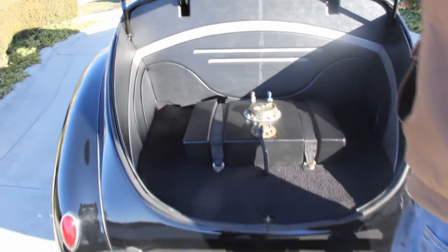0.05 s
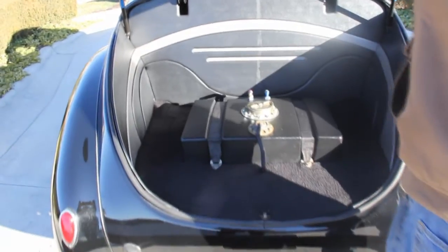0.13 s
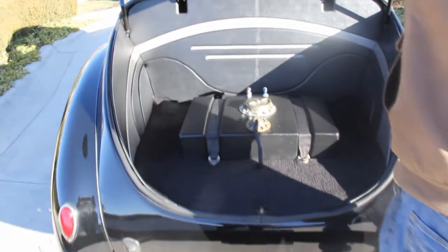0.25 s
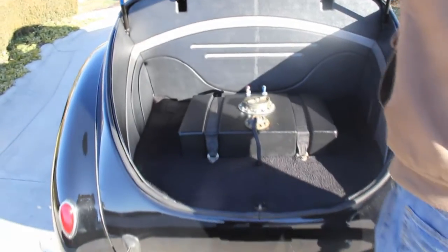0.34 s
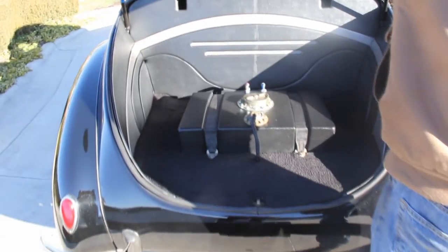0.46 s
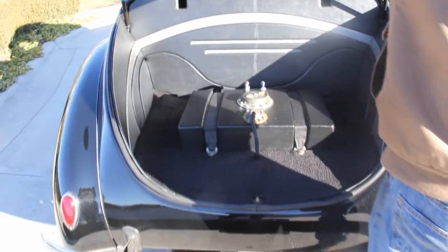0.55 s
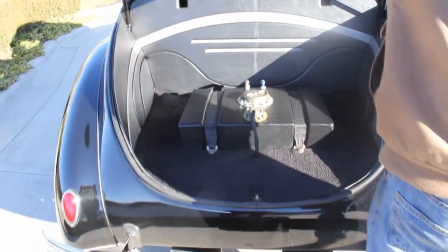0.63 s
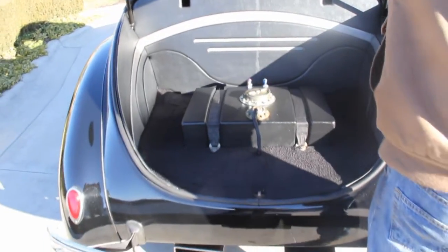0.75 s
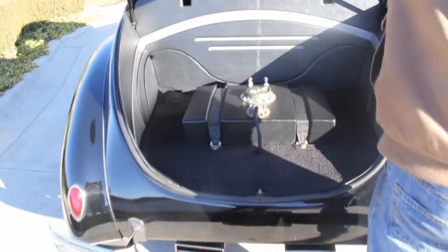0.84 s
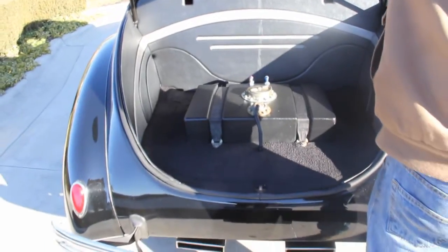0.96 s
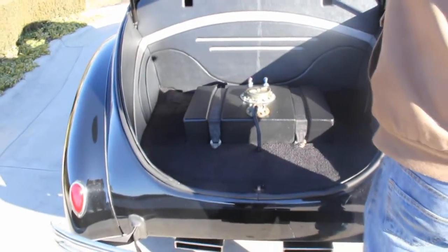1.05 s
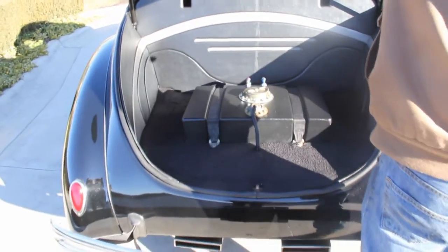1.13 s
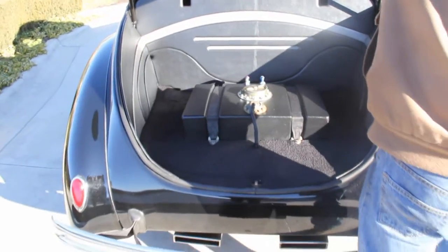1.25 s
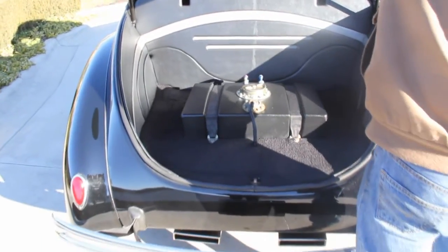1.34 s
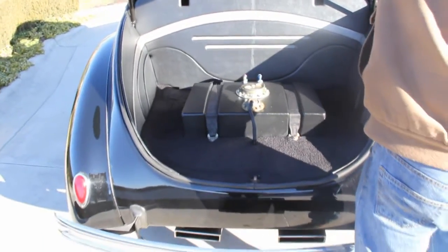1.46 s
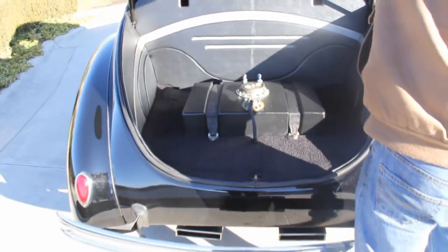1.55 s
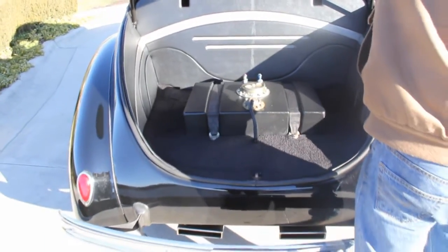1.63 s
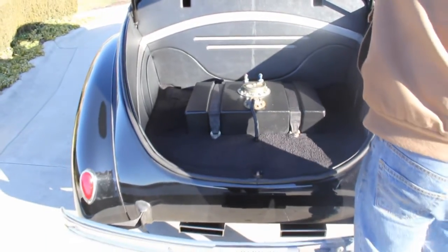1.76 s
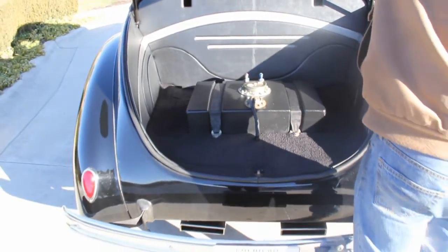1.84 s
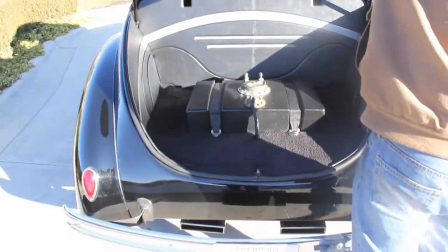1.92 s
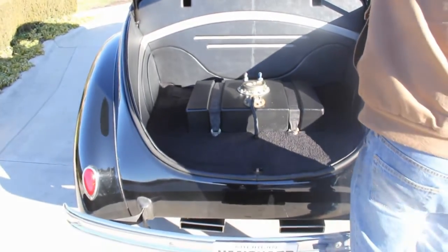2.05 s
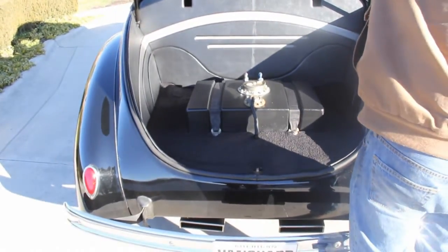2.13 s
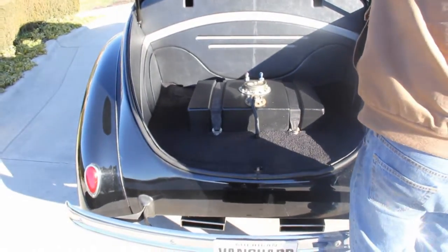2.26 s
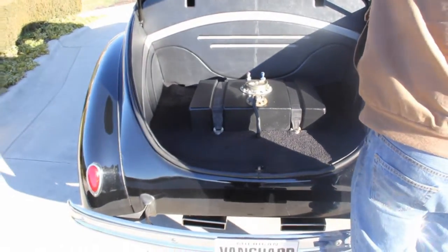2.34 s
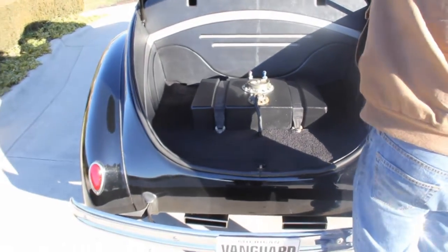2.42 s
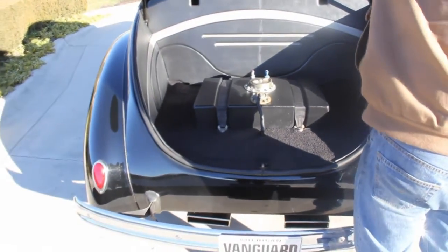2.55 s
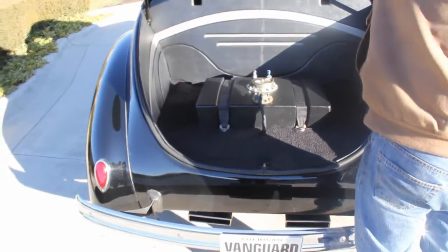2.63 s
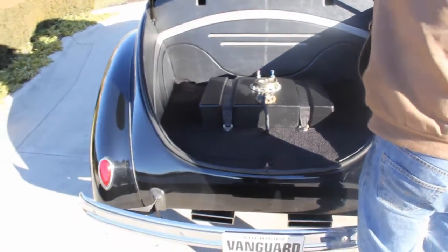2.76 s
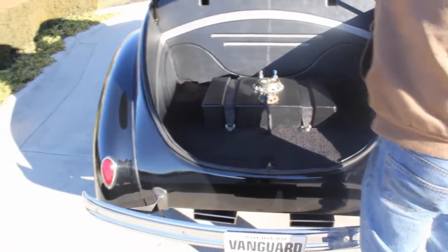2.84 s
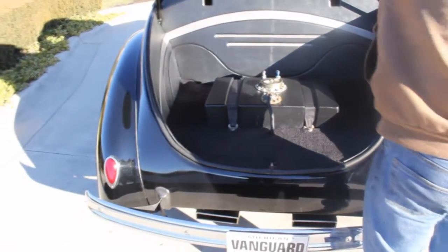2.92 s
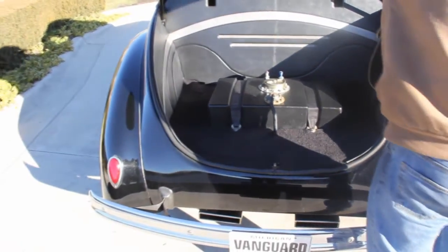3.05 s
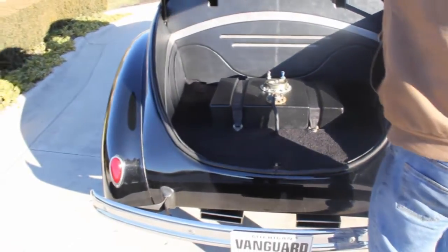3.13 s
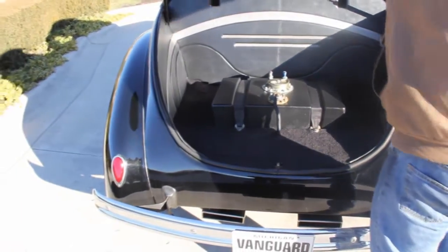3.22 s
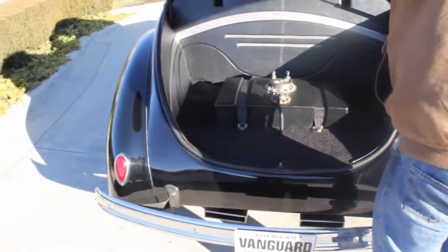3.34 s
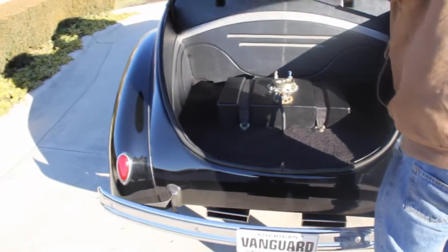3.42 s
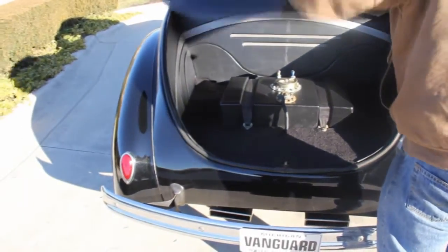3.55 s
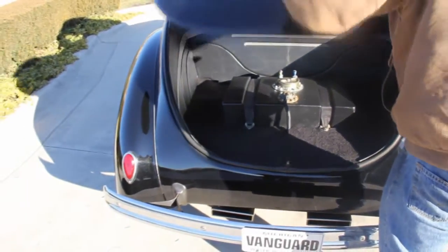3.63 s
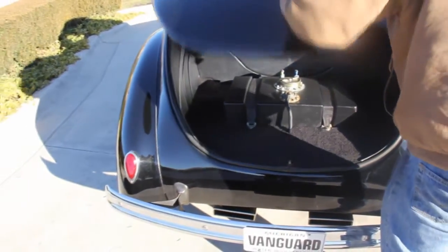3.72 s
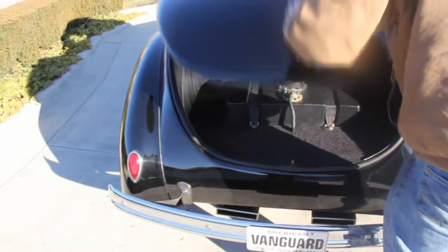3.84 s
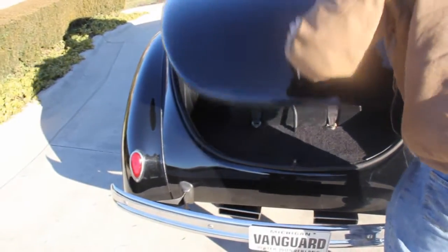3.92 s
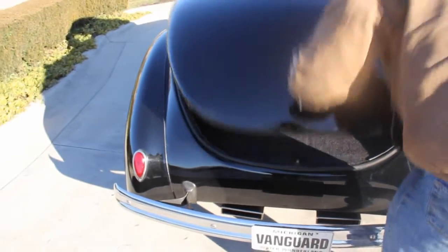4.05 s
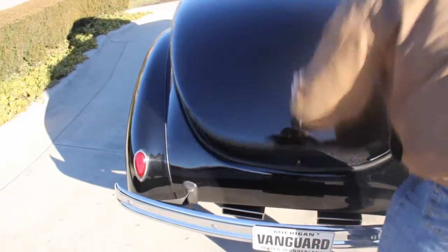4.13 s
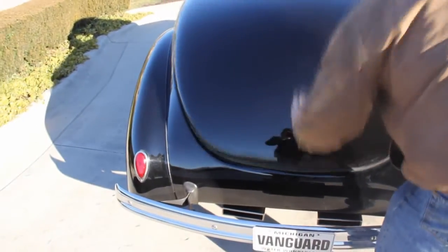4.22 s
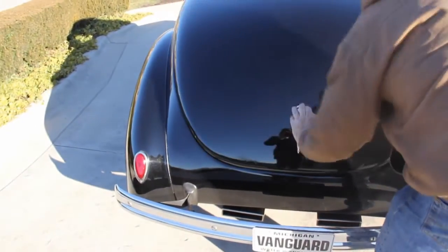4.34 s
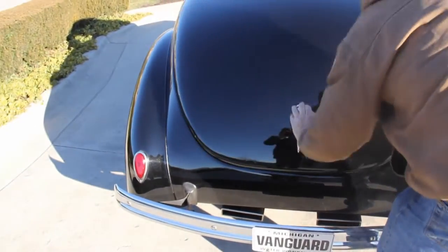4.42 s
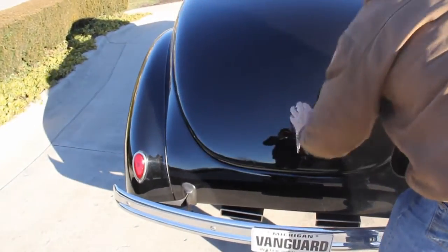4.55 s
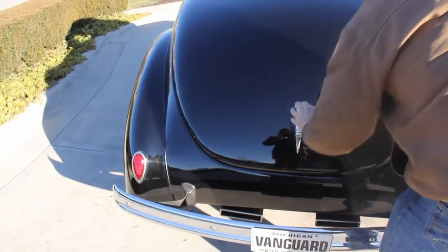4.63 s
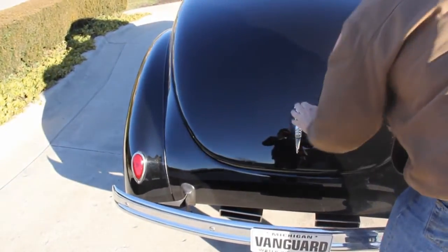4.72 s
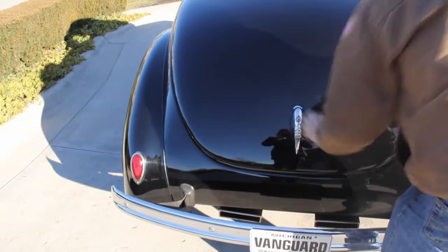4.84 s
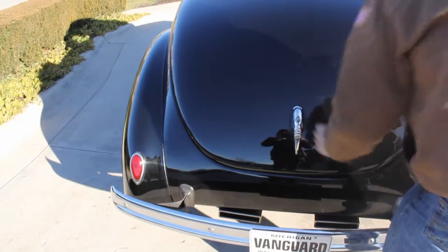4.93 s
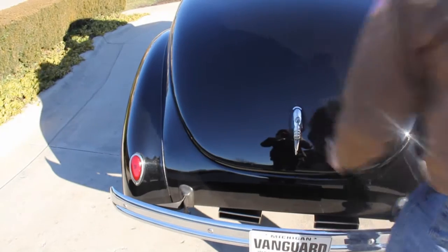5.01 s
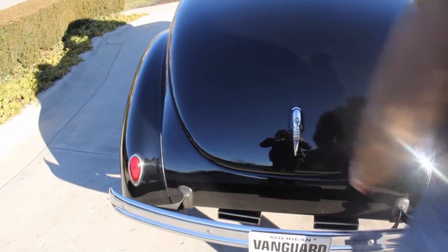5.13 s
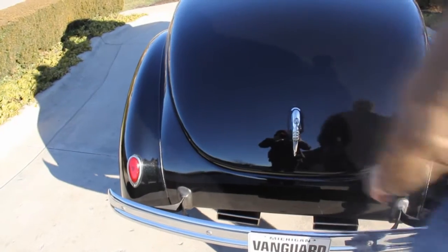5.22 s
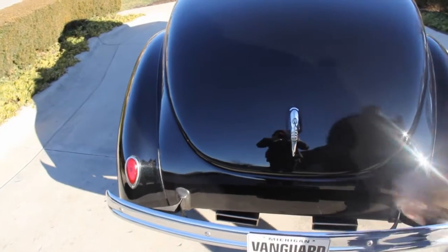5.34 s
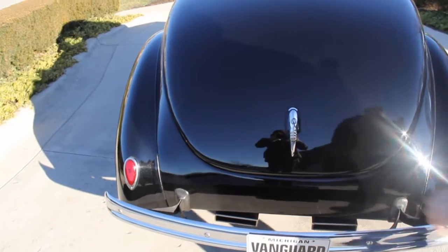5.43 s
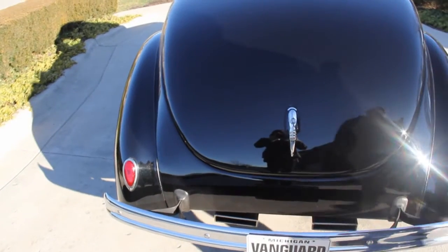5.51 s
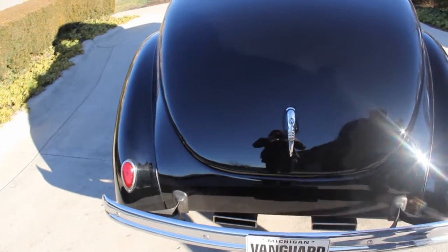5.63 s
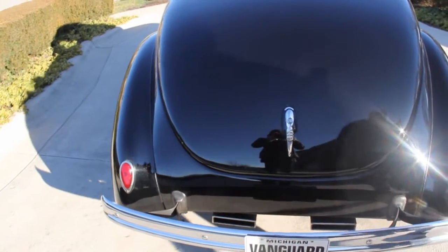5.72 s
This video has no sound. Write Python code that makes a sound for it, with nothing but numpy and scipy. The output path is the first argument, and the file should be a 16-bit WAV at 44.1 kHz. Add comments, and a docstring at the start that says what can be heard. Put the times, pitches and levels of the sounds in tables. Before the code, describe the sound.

An old car's steel trunk lid squeaks downward and bangs shut very loudly, after light fitting knocks, clinks and camera fumbling.

```python
"""The steel trunk lid of an old car slams on a quiet driveway, heard from a hand-held camera an arm's length away.
Lid, latch and panels are struck modes and band-shaped noise; the slam is loud enough to clip the microphone.
Before it, fittings knock and clink, the lid's stay creaks in stick-slip bursts and the hinge squeaks upward
as a stack of harmonics. A sleeve rustles and the hand bumps the camera, as shaped noise and damped swings.
Filtered noise makes the outdoor air; the car's sounds also pass through a faint noise echo of the yard."""
import sys
import numpy as np
from scipy import signal
from scipy.fft import rfft, irfft, next_fast_len
from scipy.io import wavfile
from scipy.ndimage import uniform_filter1d

SR = 44100
rng = np.random.default_rng(int(sys.argv[2]) if len(sys.argv) > 2 else 0)


def waveform_to_disk(signal):
    """Save audio, clipped to [-1, 1], as 16-bit WAV at the path in sys.argv[1]."""
    frames = np.transpose(np.atleast_2d(signal))
    scaled = np.clip(frames, -1, 1) * 32767
    samples = np.round(scaled).astype(np.int16)
    wavfile.write(sys.argv[1], SR, samples)


N = 254627
T = np.arange(N) / SR  # scene time [s]
AGE = np.arange(32768) / SR  # time since a blow [s]
CENTRES = 62.5 * 2 ** (np.arange(16) / 2)  # half-octave band centres [Hz]

# Table levels are relative: the functions trim and filter them further.
# Blows of the slam, in turn: latch meets striker, lid lands, latch snaps, lid seats:
# (time [s], boom [dB], clang [dB], crack [dB], push time constant [s])
SLAM_BLOWS = [(4.3414, -18.5, -9, -16, 0.00028), (4.3457, -1.5, -4.5, -28.5, 0.00078),
              (4.361, -22.5, -23, -15.5, .0003), (4.3678, -3.5, -3, -14.5, 0.00018),
              (4.3697, -7, -5, -19, 0.00029), (4.3785, -6.5, -11.5, -31, .002)]
# Steel latch and striker modes: (frequency [Hz], level [dB], t60 [s])
LATCH_MODES = [(1631, -4.5, 0.061), (1933, -1.5, .08), (1987, 1, .08), (2240, -9.5, 0.06), (3300, -7, 0.06),
               (3630, -7.5, 0.033), (3810, -6.5, 0.063), (4290, -9.5, 0.034), (5860, -8.5, 0.033),
               (5860, -11, .04)]
# Trapped air and skin of the lid, booming as it lands: (frequency [Hz], level [dB], t60 [s])
BOOM_MODES = [(166.6, 1, 0.11), (226.4, -2, 0.1), (315, -8, .04), (550, -5, 0.1), (740, -12.5, 0.017)]
# Lid and hollow trunk, ringing once seated: (frequency [Hz], level [dB], t60 [s])
LID_MODES = [(60, -32, .6), (91, -26, 0.63), (120.3, -15.5, 0.65), (152.7, -3.5, 0.46), (167.7, -18, 0.17),
             (184.5, -8.5, 0.47), (230, -17.5, 0.42), (258, -6.5, 0.38), (306, -15.5, 0.45),
             (312, -3, 0.22), (352, -17, .2), (360, -18, 0.42), (376, -12, 0.26), (403, -13.5, 0.27),
             (424, -16, 0.16), (535, -17.5, .33), (518, -15.5, 0.12), (546, -16.5, 0.11), (620, -10, 0.24),
             (630, -8.5, 0.38), (649, -5.5, .15), (677, -0.5, 0.22), (734, -10, 0.21), (790, -15.5, 0.14),
             (857, -11.5, 0.11), (982, -12.5, 0.22), (1186, -14, 0.091), (1234, -21.5, 0.22),
             (1550, -22, 0.2), (2046, -14, 0.14)]
# Fade of the countless fine panel modes: (frequency [Hz], t60 [s])
PANEL_FADE = [(100, 0.13), (300, 0.18), (800, 0.23), (2000, 0.083), (5000, 0.084), (12000, 0.0082)]
LANDS_S, SEATS_S = 4.3443, 4.368  # starts of the boom and of the lid's ring

# Hinge squeak, low register: (time [s], slip rate [Hz], level [dB])
LOW_SQUEAK = [(3.64, 128.5, -52), (3.68, 135, -60), (3.74, 157.8, -57), (3.80, 168.6, -55),
              (3.86, 170.5, -47), (3.92, 189.4, -45.5), (3.95, 208, -47), (3.98, 220.7, -57.5),
              (4.03, 230, -66.5)]
# Hinge squeak, about an octave up: (time [s], slip rate [Hz], level [dB])
HIGH_SQUEAK = [(3.93, 369, -61.5), (3.98, 385, -47), (4.04, 417, -43.5), (4.10, 436, -50.5),
               (4.16, 449, -45.5), (4.22, 461, -41.5), (4.26, 471, -46.5), (4.30, 504, -62)]
# Resonances of the hinge: (frequency [Hz], gain [dB])
HINGE_RESPONSE = [(150, -14), (230, -6), (330, -4.5), (410, -5), (460, 2), (570, 3), (720, 6), (900, -8.5),
                  (1080, -12), (1280, 4), (1420, -8.5), (1800, -18.5), (2150, -14.5), (2350, -25),
                  (2700, -27), (5000, -33.5)]

# Creaks of the stay, a short jerk and then a run of slips: (start [s], length [s], first gap [s],
# level [dB], level change [dB per s], brightness [dB per octave])
STAY_CREAKS = [(2.939, .032, .0095, -37.5, -450, 3), (2.996, .172, .028, -36, -19, 1)]
# Ringing of the stay: (frequency [Hz], level [dB], t60 [s])
STAY_MODES = [(507.7, -5, 0.19), (808, -1.5, 0.12), (1120, -29, .05), (1423, -7.5, 0.13), (1510, -3, 0.064),
              (1934, -7, 0.078), (2350, -10.5, 0.079), (2690, -0.5, 0.024), (3930, -5, 0.026)]
SLIP_GAP_RATIO = .91  # each gap over the one before
SLIP_DULLING = 40  # loss of brightness [dB per octave per s]

# Knocks of fittings on the body:
# (time [s], thud [dB], knock [dB], tick [dB], thud centre [Hz])
FITTING_KNOCKS = [(0.290, -37, -55, -56, 300), (0.413, -34, -36.5, -52, 284), (0.643, -41, -59, -76, 298),
                  (0.746, -37, -43.5, -53, 303), (1.043, -31, -29, -31, 247), (1.048, -15, -37.5, -34, 300),
                  (1.487, -39.5, -50.5, -70, 314), (1.744, -40.5, -58, -52, 292),
                  (2.027, -46, -53, -52, 215), (2.241, -36, -38, -45.5, 290),
                  (2.250, -27.5, -45.5, -77, 266), (2.332, -21, -21.5, -15.5, 252),
                  (2.394, -26.5, -32, -30.5, 276), (2.425, -15, -31, -41.5, 310),
                  (2.771, -41, -42, -42.5, 300), (3.652, -50, -47, -60, 400), (5.285, -48.5, -50, -57, 325),
                  (5.633, -64, -49.5, -61, 302.4)]
# Body modes under a knock: (frequency [Hz], level [dB], t60 before KNOCK_RING [s])
BODY_MODES = [(159.3, 7, 0.23), (183, 11.5, 0.22), (231.8, 4, 0.29), (305, 3, 0.17), (354.2, 3.5, 0.16),
              (446, -17, 0.04), (534, -8, 0.053), (616.3, -9, 0.27), (860, -3, 0.33), (1009, -2.5, 0.22),
              (1186, 1.5, 0.083), (1452, -1, 0.097), (1580, 6, 0.0347), (2520, -15, 0.026),
              (3310, -4, 0.053), (3800, 7.5, 0.018)]
# Fade of the dense body modes: (frequency [Hz], t60 before KNOCK_RING [s])
KNOCK_FADE = [(150, 0.24), (600, 0.21), (2000, 0.13), (5000, 0.032), (12000, 0.035)]
KNOCK_RING = 0.83  # ring time factor of the body while a hand holds the fitting
# Clinks of loose metal: (time [s], level [dB])
METAL_CLINKS = [(0.76, -54), (1.0935, -28.5), (1.0971, -25), (1.1145, -27.5), (1.132, -42), (4.587, -63),
                (4.618, -65)]
# Ringing of the loose metal: (frequency [Hz], level [dB], t60 [s])
METAL_MODES = [(2830, -10, 0.047), (3370, -3, 0.08), (3470, -1, 0.071), (3570, -19, 0.097),
               (4060, -38, 0.074), (4930, 8.5, 0.014), (4942, -6, 0.056), (5340, -10, 0.054),
               (5680, 1.5, 0.046), (6040, -26, 0.039), (7100, -6.5, 0.047), (8280, -6, .05),
               (8900, -15, .04), (10900, -17, .035)]
# Small dry ticks: (time [s], level [dB], centre [Hz])
DRY_TICKS = [(0.741, -48, 4430), (0.758, -38, 4340), (1.714, -43.5, 5000), (1.7418, -42, 4500),
             (1.75, -34.5, 2700), (2.202, -44, 3180), (2.487, -42, 5160), (2.771, -34, 4700),
             (3.655, -46, 2460), (4.302, -45, 4000), (4.320, -41, 3460), (4.556, -45.5, 4800),
             (4.617, -39, 4830), (4.822, -39, 7700)]
# Fainter ticks at chance moments while the fittings are handled
STRAY_START_S, STRAY_END_S = .7, 3.7
STRAY_DB, STRAY_SCATTER_DB, STRAY_HZ = -55, 2, 4500
# Loose parts jiggling on: (start [s], length [s], level [dB])
LOOSE_JIGGLES = [(1.12, 0.13, -49.5), (1.427, 0.33, -54), (2.345, 0.081, -45), (2.774, 0.034, -51)]

# Strokes of the sleeve over the jacket:
# (fastest at [s], rise [s], fall [s], level [dB], brightness [dB per octave])
SLEEVE_STROKES = [(.39, 0.1, 0.12, -54, 0.5), (1.12, 0.13, 0.12, -51, -2.5), (2.97, 0.094, 0.58, -50, -1.5),
                  (3.45, 0.17, .08, -40.5, 1), (3.511, 0.068, 0.072, -42, -1.5),
                  (3.95, .06, 0.65, -55.5, -3.5), (4.13, 0.024, 0.039, -47.5, 6.5),
                  (4.8, 0.23, 0.32, -60, -2.5), (5.2, 0.087, 0.088, -47.5, 1), (5.489, .04, 0.14, -50, -.5),
                  (5.75, 0.096, 0.083, -56.5, -2)]
# Spectrum of rubbing cloth: (frequency [Hz], density [dB per Hz])
CLOTH_SPECTRUM = [(300, 2), (550, 3), (1200, 4), (2200, -5), (4000, -4), (6500, -7.5), (10000, -11),
                  (14000, -29.5)]
SLEEVE_REST_DB = -61  # faint rustle between strokes

# Firm bumps of the hand on the camera: (time [s], level [dB], swing rate [Hz])
CAMERA_BUMPS = [(0.752, -36.5, 127), (2.035, -33.5, 124), (2.336, -22, 133), (2.43, -15, 295),
                (2.629, -18.5, 238), (2.652, -20.5, 187), (2.721, -27.5, 338), (2.750, -24, 240),
                (2.830, -17, 228), (2.849, -14.5, 179), (2.99, -27, 154), (3.2, -27.5, 151),
                (3.343, -21, 265), (3.361, -23.5, 211), (3.445, -23.5, 171), (3.497, -28, 167),
                (3.556, -25.5, 172), (4.617, -26, 170.5), (5.475, -22, 173), (5.611, -26.5, 154)]
# The hand shifts its grip on the camera: (start [s], length [s], level [dB])
GRIP_SHIFTS = [(0, 0.069, -48.5), (2.48, .12, -44), (2.608, .3, -33.5), (2.945, 0.052, -33.5),
               (3.167, 0.052, -39.5), (3.31, 0.28, -37), (3.925, 0.058, -44.5), (4.218, 0.23, -40),
               (4.627, 0.19, -44.5), (5.407, 0.073, -45), (5.519, 0.089, -36), (5.694, 0.032, -40)]
# Spectrum of the hand's rumble: (frequency [Hz], density [dB per Hz])
HANDLING_SPECTRUM = [(25, -24), (55, -20), (100, -7), (135, 1.5), (200, -7.5), (320, -14.5), (600, -39.5),
                     (2000, -68)]
GRIP_EDGE_S, STILL_HAND_DB = 0.021, -54  # time to tighten or relax; rumble of the hand at rest

# Spectrum of the outdoor air: (frequency [Hz], density [dB per Hz])
AIR_SPECTRUM = [(15, -38), (25, -22), (96, -2.5), (204, 0), (240, -3.5), (342, -1.5), (536, -8.5),
                (1010, -13), (1220, -15), (4690, -30), (5280, -31), (7000, -41), (9100, -69.5),
                (15400, -120)]
AIR_DB = -54.5
# Fade of the yard's echo: (frequency [Hz], t60 [s])
YARD_FADE = [(100, .7), (500, 0.41), (2000, 0.39), (8000, 0.25)]
# Tone of the microphone: (frequency [Hz], gain [dB])
MICROPHONE_RESPONSE = [(20, -20.5), (70, -1.5), (6400, -4), (7100, -9.5), (7700, -21), (10300, -16.5),
                       (12000, -29), (16000, -39)]
TOP_HZ = 15800  # upper edge of the microphone's band


def slam(modes_db=-3.5, boom_db=-1, latch_db=-2, panel_db=-4, crack_db=-6, crack_t60=0.006,
         seal_db=5, seal_s=4.4, seal_time=0.036):
    """Quick blows of latch and rim shake the panels; the lid booms as it lands and rings once it is seated."""
    out = np.zeros(N)
    for s, boom, clang, crack, push in SLAM_BLOWS:
        tone = [(60, boom - 38), (170, boom - 12), (400, clang - 8), (750, clang - 3), (1400, clang - 9),
                (1900, (clang + crack) / 2), (2700, crack - 6), (3800, crack - 2), (6000, crack - 4),
                (14000, crack - 14)]
        panels = amp(panel_db) * clatter(tone, PANEL_FADE)
        contact_tone = [(300, crack - 14), (3500, crack), (12000, crack - 8)]
        contact = amp(crack_db) * clatter(contact_tone, [(1000, crack_t60)])
        steel = ring(LATCH_MODES, [(2000, crack + latch_db)])
        # a longer push starts more softly
        onset = 1 - np.exp(-AGE / push)
        add(out, s, (panels + contact + steel) * onset)
    add(out, LANDS_S, low_cut(ring(BOOM_MODES, [(200, boom_db)]), hz=110))
    add(out, SEATS_S, low_cut(ring(LID_MODES, [(200, modes_db)]), hz=45.5))
    # the rubber seal grips the rim and damps the lid as it seats
    free = (1 - np.tanh((T - seal_s) / seal_time)) / 2
    return out * amp(seal_db * (free - .5))


def squeak(rows, waver=0.003, flutter_db=2.5):
    """Regular slips in the hinge, quickening with the swing; the harmonics pass through its resonances."""
    hz, db = curves(rows)
    on = (T > rows[0][0]) & (T < rows[-1][0])
    slip_hz = (hz * (1 + waver * walk(78)))[on]
    harmonic = np.arange(1, 15)[:, None]
    phase = 2 * np.pi * harmonic * np.cumsum(slip_hz) / SR
    tone = (amp(at(HINGE_RESPONSE, harmonic * slip_hz)) * np.sin(phase)).sum(0)
    out = np.zeros(N)
    out[on] = unit(tone)
    return out * amp(db + flutter_db * walk(27))


def creak(modes_db=-2, grit_db=-10, count=10):
    """The stay sticks and slips, faster, weaker and duller as the load comes off."""
    out = np.zeros(N)
    for start, length, first_gap, first_db, fading, first_tilt in STAY_CREAKS:
        gaps = first_gap * SLIP_GAP_RATIO ** np.arange(count)
        ages = np.append(0, np.cumsum(gaps))
        for age in ages[ages < length]:
            db = first_db + fading * age
            tilt = first_tilt - SLIP_DULLING * age
            tone = [(500, db - tilt), (4000, db + 2 * tilt)]
            grit_tone = [(150, db - 8), (600, db), (2700, db + tilt), (7000, db + 3 * tilt - 4.0)]
            stay = amp(modes_db) * ring(STAY_MODES, tone)
            grit = amp(grit_db) * clatter(grit_tone, [(500, 0.11), (4000, 0.017)])
            add(out, start + age, stay + grit)
    return out


def knocks(modes_db=-4, dense_db=-5, rise=0.00026, crack_db=-3, crack_t60=0.013, rattle_db=-11, rattle_s=0.0043):
    """Fittings bump the body, each with its own depth and hardness, and chatter briefly."""
    out = np.zeros(N)
    for s, thud, knock, tick, hz in FITTING_KNOCKS:
        tone = [(hz / 4, thud - 42), (hz / 2, thud - 23), (hz, thud), (900, knock), (1800, knock - 2),
                (3800, tick + 1), (6500, tick - 2), (14000, tick - 10)]
        body = amp(modes_db) * ring(BODY_MODES, tone, KNOCK_RING)
        dense = amp(dense_db) * clatter(tone, KNOCK_FADE, KNOCK_RING)
        crack_tone = [(100, knock - 35), (1000, knock - 6), (3800, tick), (12000, tick - 7)]
        crack = clatter(crack_tone, [(1000, crack_t60)])
        onset = 1 - np.exp(-AGE / rise)
        add(out, s, (body + dense + amp(crack_db) * crack) * onset)
        # three weakening rebounds
        delays = np.cumsum(rng.uniform(.4, 1.6, size=3)) * rattle_s
        for k, delay in enumerate(delays):
            add(out, s + delay, amp(rattle_db - 5.4 * k) * crack)
    return out


def small_metal(clink_db=-3.5, jangle_db=-10, jangle_t60=0.032, tick_db=-1, tick_t60=0.014, count=10):
    """Loose metal clinks with a short jangle; catches tick, the faint ones at chance moments."""
    out = np.zeros(N)
    for s, db in METAL_CLINKS:
        jangle_tone = [(200, db - 12), (2000, db - 7.5), (5000, db), (11000, db), (16000, db - 14)]
        jangle = amp(jangle_db) * clatter(jangle_tone, [(1000, jangle_t60)])
        clink = amp(clink_db) * ring(METAL_MODES, [(3000, db), (8000, db - 1)])
        add(out, s, clink + jangle)
    strays = []
    for _ in range(count):
        stray_s = rng.uniform(STRAY_START_S, STRAY_END_S)
        strays.append((stray_s, STRAY_DB + STRAY_SCATTER_DB * rng.standard_normal(), STRAY_HZ))
    for s, db, hz in list(DRY_TICKS) + strays:
        tone = [(hz / 16, db - 33.5), (hz / 2, db - 12.5), (hz, db), (hz * 2, db - 6)]
        add(out, s, amp(tick_db) * clatter(tone, [(1000, 2 * tick_t60), (5000, tick_t60)]))
    return out


def jiggle(fall_db=-10, scatter_db=3, t60=0.029, count=9):
    """Tiny contacts at chance moments, weaker as the part comes to rest."""
    out = np.zeros(N)
    tone = [(200, -34), (900, -5.5), (1700, -1.0), (4000, -3), (12000, -8.5)]
    for s, length, db in LOOSE_JIGGLES:
        for share, size in zip(rng.uniform(size=count), rng.standard_normal(count)):
            level = amp(db + fall_db * share + scatter_db * size)
            add(out, s + share * length, level * clatter(tone, [(1000, t60)]))
    return out


def sleeve(grain_db=1.46):
    """Cloth fibres rub: a grainy hiss that swells with each stroke of the arm, dull or bright."""
    low_power = high_power = amp(SLEEVE_REST_DB) ** 2
    for s, rise, fall, db, tilt in SLEEVE_STROKES:
        speed = swell(s, rise, fall)
        low_power = low_power + (speed * amp(db - 1.7 * tilt)) ** 2
        high_power = high_power + (speed * amp(db + 0.64 * tilt)) ** 2
    hiss = unit(colour(rng.standard_normal(N), CLOTH_SPECTRUM))
    low = signal.sosfilt(signal.butter(1, 2000, fs=SR, output="sos"), hiss)
    rustle = low * np.sqrt(low_power) + (hiss - low) * np.sqrt(high_power)
    return rustle * amp(grain_db * walk(250) + walk(23))


def swell(peak_s, rise_s, fall_s):
    """A bell that rises to 1 and falls again, as the speed of an arm does."""
    width = np.where(T < peak_s, rise_s, fall_s)
    return np.exp(-np.minimum(((T - peak_s) / width) ** 2, 20))


def handling(cycles=0.41, ring_hz=140, ring_db=-12, ring_t60=0.067, rumble_db=-3, lumpy_db=5,
             nudge_db=-4, nudge_hz=200, count=350):
    """Bumps swing about one cycle and ring the camera case; a shifting grip rumbles and adds small nudges."""
    lead = .02  # room for the swing's rise [s]
    case = amp(ring_db) * np.sin(2 * np.pi * ring_hz * AGE) * fade(ring_t60)[0]

    def bump(hz):
        """One swing, centred lead seconds in, and the ring after it."""
        turns = (AGE - lead) * hz
        swing = np.sin(2 * np.pi * turns) / np.cosh(np.minimum(abs(turns) / cycles, 20))
        return swing + np.roll(case, int(lead * SR))

    grip = np.zeros(N)
    for s, length, db in GRIP_SHIFTS:
        tighten = np.tanh((T - s) / GRIP_EDGE_S)
        relax = np.tanh((T - s - length) / GRIP_EDGE_S)
        grip += amp(db) * (tighten - relax) / 2
    rumble = unit(colour(rng.standard_normal(N), HANDLING_SPECTRUM) * amp(lumpy_db * walk(18)))
    nudges = np.bincount(rng.integers(N, size=count), rng.standard_normal(count), N)
    bumps = amp(nudge_db) * grip * unit(signal.fftconvolve(nudges, bump(nudge_hz))[:N])
    for s, db, hz in CAMERA_BUMPS:
        add(bumps, s - lead, amp(db) * bump(hz))
    return low_cut(bumps, hz=48) + rumble * (amp(STILL_HAND_DB) + amp(rumble_db) * grip)


def yard(x, wet_db=-24, build=0.027):
    """House front and hedge scatter a faint late echo."""
    tone = [(60, -13), (300, -0.5), (1500, 0.0), (5000, 9), (14000, -10.5)]
    echo = clatter(tone, YARD_FADE) * (1 - np.exp(-AGE / build))
    echo = echo / np.sqrt(np.sum(echo ** 2))
    return x + amp(wet_db) * signal.fftconvolve(x, echo)[:N]


def air():
    """Quiet outdoor background, swelling a little."""
    return unit(colour(rng.standard_normal(N), AIR_SPECTRUM)) * amp(AIR_DB + walk(3.6))


def ring(modes, tone, stretch=1):
    """Struck modes of alternating sign, weighted by the (Hz, dB) tone of the blow."""
    hz, db, t60 = np.transpose(modes)
    size = amp(db + at(tone, hz)) * (-1) ** np.arange(len(hz))
    return size @ (np.sin(2 * np.pi * hz[:, None] * AGE) * fade(t60 * stretch))


def clatter(tone, t60s, stretch=1):
    """Modes too dense to tell apart: noise that dies band by band."""
    decay = fade(at(t60s, CENTRES) * stretch)
    return amp(at(tone, CENTRES)) @ (bands(len(AGE)) * decay)


def bands(size):
    """Half-octave bands of noise, each at rms 1."""
    hz = np.maximum(np.fft.rfftfreq(size, 1 / SR), 1)
    steps = 2 * np.log2(hz / CENTRES[:, None])
    weights = np.maximum(1 - abs(steps), 0)
    return unit(irfft(rfft(rng.standard_normal(size)) * weights, size))


def fade(t60):
    """Exponential decays that lose 60 dB in t60 seconds, one row for each time."""
    return np.exp(-np.log(1000) * AGE / np.reshape(t60, (-1, 1)))


def colour(x, points):
    """Causal minimum-phase filter with the given (Hz, dB) response."""
    size = next_fast_len(len(x) + 4096)
    gain = amp(at(points, np.fft.rfftfreq(size, 1 / SR)))
    # folding the cepstrum forward in time makes the filter causal
    cepstrum = irfft(np.log(gain), size)
    cepstrum[1:size // 2] *= 2
    cepstrum[size // 2 + 1:] = 0
    return irfft(rfft(x, size) * np.exp(rfft(cepstrum)), size)[:len(x)]


def low_cut(x, hz):
    """Take away the bass below hz."""
    return signal.sosfilt(signal.butter(3, hz, "high", fs=SR, output="sos"), x)


def walk(rate):
    """Random wander at about rate steps per second, trimmed to the scene's length and then scaled to rms 1."""
    k = int(SR / rate)
    steps = np.repeat(rng.standard_normal(N // k + 1), k)
    smooth = uniform_filter1d(uniform_filter1d(steps, k), k)
    return unit(smooth[:N])


def curves(rows):
    """The columns of a (time [s], ..) table at every sample."""
    s, *columns = np.transpose(rows)
    return [np.interp(T, s, c) for c in columns]


def at(points, hz):
    """Read (Hz, value) points on a log-frequency axis."""
    f, value = np.transpose(points)
    return np.interp(np.log(np.maximum(hz, 1)), np.log(f), value)


def add(out, s, sound):
    """Mix a sound in at time s."""
    i = int(s * SR)
    out[i:i + len(sound)] += sound[:N - i]


def unit(x):
    """Scale to rms 1."""
    return x / np.sqrt(np.mean(x ** 2, axis=-1, keepdims=True))


def amp(db):
    """Decibels to gain."""
    return 10 ** (np.asarray(db) / 20)


def scene():
    """The car's sounds in the yard, with the nearby sleeve, camera noise and air."""
    fittings = low_cut(knocks() + small_metal() + jiggle() + creak(), hz=124)
    car = slam() + fittings + squeak(LOW_SQUEAK) + squeak(HIGH_SQUEAK)
    return (yard(car, wet_db=-29) + sleeve() + handling() + air())[None]


def record(dry):
    """The microphone is dull above 7 kHz and clips loud peaks; deepest bass and highest treble are cut."""
    clipped = np.clip(colour(dry[0], MICROPHONE_RESPONSE), -1, 1)
    top_cut = signal.ellip(8, .2, 70, TOP_HZ, fs=SR, output="sos")
    return signal.sosfilt(top_cut, low_cut(clipped, hz=36))[None]


dry = scene()
out = record(dry)
waveform_to_disk(out)
```